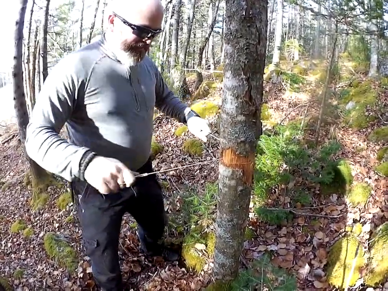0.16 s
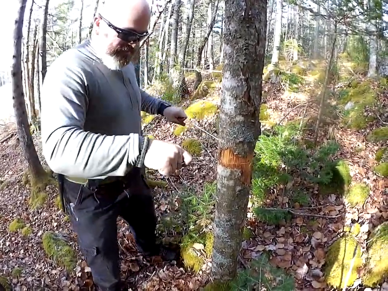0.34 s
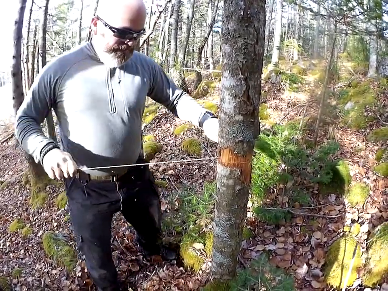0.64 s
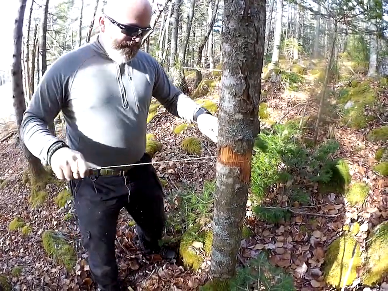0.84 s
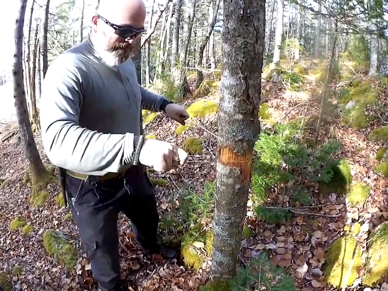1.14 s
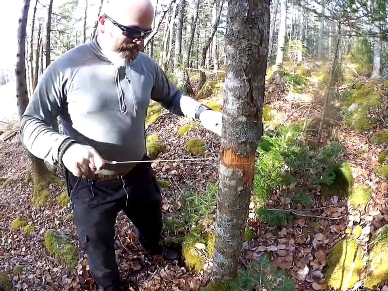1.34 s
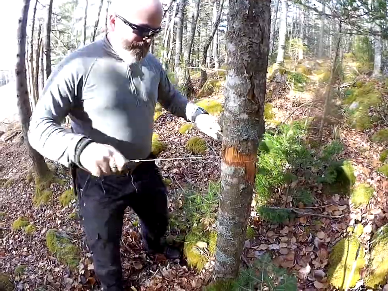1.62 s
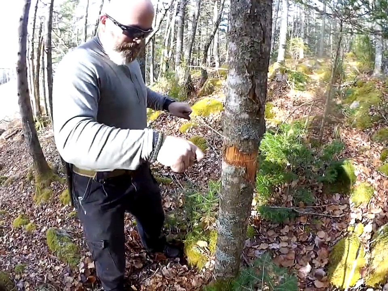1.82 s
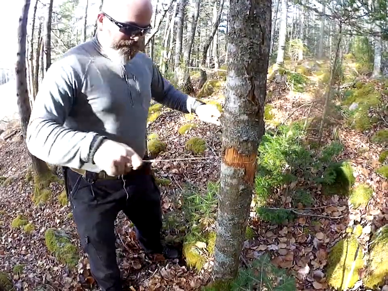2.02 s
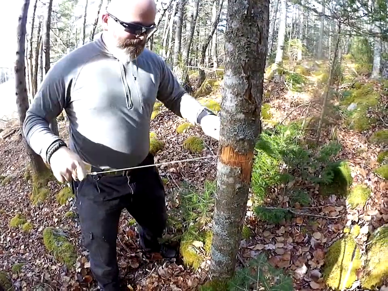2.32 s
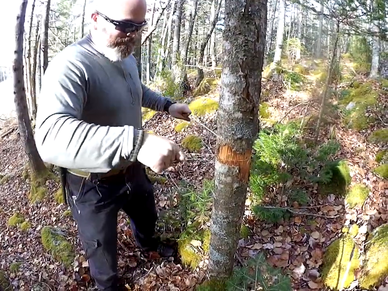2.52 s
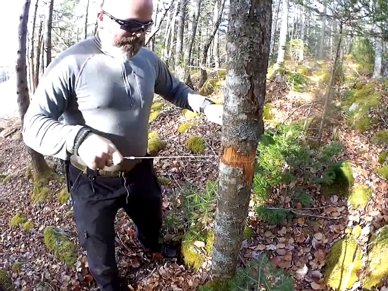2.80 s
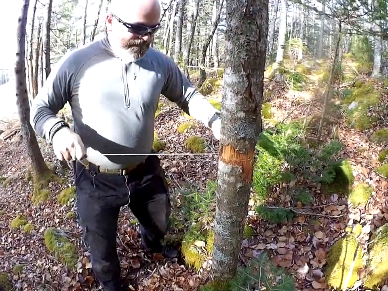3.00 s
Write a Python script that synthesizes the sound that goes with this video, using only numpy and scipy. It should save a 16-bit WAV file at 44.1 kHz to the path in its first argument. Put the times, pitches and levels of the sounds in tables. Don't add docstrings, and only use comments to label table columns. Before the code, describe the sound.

A wire saw is pulled to and fro through a thin trunk, nine short gritty rasps with small gaps, pulls louder than pushes, close to a small stereo microphone in a quiet open wood.

```python
import sys
import numpy as np
from scipy import signal
from scipy.fft import rfft, irfft, next_fast_len
from scipy.io import wavfile
from scipy.ndimage import uniform_filter1d

SR = 44100
rng = np.random.default_rng(int(sys.argv[2]) if len(sys.argv) > 2 else 0)


def amplitude_ratio(level_db):
    exponent = np.asarray(level_db, float) / 20
    return 10 ** exponent


def master(y):
    cut = np.clip(np.atleast_2d(y).T, -1, 1)
    pcm = np.round(cut * 32767)
    wavfile.write(sys.argv[1], SR, pcm.astype(np.int16))


N = 138915

# pitch_hz, level_db; pitch_hz, likeness_0_to_1
AIR_SPECTRUM = [(30, -15), (100, -4.5), (250, -9.5), (500, -10.5), (1300, -12), (2600, -16), (4500, -15.5),
                (8000, -13)]
AIR_LIKENESS = [(60, 0.42), (180, 0.61), (530, 0.72), (1600, .5), (4770, 0.2), (10000, 0.26)]
# pitch_hz, likeness_0_to_1
SAW_LIKENESS = [(200, 1), (700, 1), (2000, 0.98), (4000, 0.64), (7000, 0.46), (12000, 0.27)]
# pitch_hz, difference_db
PORT_LEAN = [(60, 0), (250, -3), (500, 1), (1300, -7), (2500, 0), (4700, 1), (8000, 3.8), (12000, -4)]
# pitch_hz, lead_rad
PORT_LEAD = [(0, -0.93), (520, 0.4), (950, -0.79), (1640, 0.94), (2150, -0.17), (2670, 0.52), (3100, 0.027),
             (4910, 0.51)]
# start_s, level_db, pitch_hz
GRABS = [
    (.066, -60.5, 228.5),
    (.425, -62, 331),
    (.797, -60, 299),
    (1.185, -63.5, 269),
    (1.548, -60.5, 291),
    (2.315, -60.5, 243.9),
    (2.691, -63, 209.8),
    (3.073, -61.5, 296),
    (3.099, -65, 215),
]
# start_s, peak_db, brightness_0_to_1
TICKS = [
    (0.0932, -52, 0.4),
    (0.3453, -64, .95),
    (0.3975, -62.5, 1),
    (.4239, -51, 1),
    (1.9181, -48.5, .01),
    (3.0385, -46.5, 0.09),
]
# pitch_hz, t60_s, level_db
WOOD_MODES = [(2350, .03, -3), (1800, .016, -3), (4500, .014, -11), (1200, .012, -7), (330, .02, -20)]
WIRE_MODES = [(7080, 0.0061, 14.5), (9700, 0.0044, 10), (4100, 0.004, -15), (5050, .006, -6)]
# start_s, length_s, early_effort_db, late_effort_db, top_twist_rate_hz
STROKES = [
    (.069, 0.27, -51, -51, 1255),
    (.418, .278, -48, -46.5, 1254),
    (.794, 0.31, -53.5, -50, 1251),
    (1.181, 0.27, -48, -45.5, 1247),
    (1.541, .29, -52.5, -46.5, 1286),
    (1.925, .29, -48.5, -43.5, 1258),
    (2.315, .268, -50.5, -45.5, 1280),
    (2.688, 0.27, -49, -41.5, 1280),
    (3.07, 0.29, -46.5, -58.5, 1256),
]
# centre_s, extra_db, length_s,
# centre_hz
BITES = [(0.191, -10, 0.013, 1470), (0.273, 2, 0.02, 4140), (0.315, 8.5, 0.016, 1160),
         (0.586, 5.5, 0.031, 2480), (.617, 11.5, 0.0075, 1780), (0.654, 9, 0.017, 2070),
         (0.812, 9.5, 0.024, 1200), (0.888, 7.5, 0.0094, 1430), (0.991, 5, 0.045, 4323),
         (1.029, 11.5, 0.0051, 1717), (1.247, 0, .015, 1253), (1.263, 6, 0.015, 2570),
         (1.397, 7, 0.014, 1960), (1.772, 7, 0.012, 2000), (1.972, 8.5, 0.01, 1900),
         (2.09, 4, 0.0075, 2070), (2.14, 4.5, 0.023, 1510), (2.125, 3.5, 0.021, 2920),
         (1.735, 8, 0.011, 2330), (2.375, 4, 0.043, 1950), (2.486, -4, 0.022, 1346),
         (2.746, 6, 0.014, 2195), (2.84, 4, 0.023, 2100), (2.885, 7, 0.011, 1469), (2.904, 4, 0.015, 1997),
         (3.129, 11.5, 0.009, 1520)]
# pitch_hz, level_db
PULL_SPECTRUM = [(150, -12.5), (500, -15.5), (1000, -7), (2000, -0.5), (3400, -10.5), (4600, -13),
                 (7000, -8), (12000, -15.5)]
PUSH_SPECTRUM = [(150, -4.5), (500, -10.5), (1000, -3), (2000, 1), (3400, -6.5), (4600, -9), (7000, -4),
                 (12000, -11)]
# pitch_hz, width_hz, gain_db
TRUNK_MODES = [(272, 28, 4), (1239, 143, 6), (1669, 127, -7), (1862, 73, 2), (2130, 60, 4), (2455, 69, 1),
               (3335, 88, 3.5), (4345, 940, 4)]
# pitch_hz, level_db
MIC_RESPONSE = [(30, -33), (100, -11.5), (250, -1), (4600, 1), (5800, -24), (10000, -22), (12000, -33),
                (16000, -80.5)]
HISS_SPECTRUM = [(3000, -32), (6000, -4), (9000, 3.5), (12000, -7), (14000, -13), (16000, -28)]


def evened(x):
    return x / np.sqrt(np.mean(x ** 2) + 1e-20)


def read(points, hz):
    f, value = np.transpose(points)
    return np.interp(np.log(hz + 1), np.log(f + 1), value)


def slow(seconds):
    width = max(int(seconds * SR), 2)
    once = uniform_filter1d(rng.standard_normal(N), width)
    return evened(uniform_filter1d(once, width))


def causal(gain_db):
    log_gain = np.log(amplitude_ratio(np.maximum(gain_db, -100)))
    circle = np.r_[log_gain, log_gain[-2:0:-1]]
    return np.fft.ifft(np.exp(np.conj(signal.hilbert(circle)))).real[:len(gain_db)]


def ports(near, other, likeness):
    size = next_fast_len(N + 4096)
    hz = np.fft.rfftfreq(size, 1 / SR)
    same = np.clip(read(likeness, hz), 0, 1)
    lean = amplitude_ratio(read(PORT_LEAN, hz) / 2)
    a, b = rfft(near, size), rfft(other, size)
    shared = same * a * np.exp(-1j * read(PORT_LEAD, hz))
    right = (shared + np.sqrt(1 - same ** 2) * b) / lean
    return np.array([irfft(a * lean, size), irfft(right, size)])[:, :N]


def air():
    air_db, rustle_db, rustle_end_s = -64, -66.5, 0.13
    rustle_hz, rustle_width_hz = 4230, 1600
    hz, t = np.fft.rfftfreq(N, 1 / SR), np.arange(N) / SR
    z = rfft(rng.standard_normal((4, N)))
    hush = evened(irfft(z[:2] * amplitude_ratio(read(AIR_SPECTRUM, hz)), N))
    hush = hush * amplitude_ratio(air_db + 0.34 * slow(0.15))
    rustle = evened(irfft(z[2:] * np.exp(-((hz - rustle_hz) / rustle_width_hz) ** 2), N))
    dying = np.clip(1 - t / rustle_end_s, 0, 1)
    return ports(*(hush + amplitude_ratio(rustle_db) * rustle * dying), AIR_LIKENESS)


def wood(x):
    level_db, t60_s, delay_s = -34, 0.099, 0.004
    t = np.arange(SR // 2) / SR
    tail = rng.standard_normal((2, len(t))) * amplitude_ratio(-60 * t / t60_s) * (t > delay_s)
    tail = tail / np.linalg.norm(tail[0])
    return amplitude_ratio(level_db) * signal.fftconvolve(x[None], tail, axes=1)[:, :N]


def grabs():
    peak_s, rise, width_hz = 0.013, 1.1, 90
    out, t = np.zeros(N + 4000), np.arange(4000) / SR
    pole = np.exp(-np.pi * width_hz / SR)
    for start_s, level_db, pitch_hz in GRABS:
        noise = rng.standard_normal(len(t)) + 1j * rng.standard_normal(len(t))
        wobble = signal.lfilter([1], [1, -pole], noise)
        carrier = np.exp(2j * np.pi * pitch_hz * (t + rise * t ** 2 / 0.1))
        swell = np.e * t / peak_s * np.exp(-t / peak_s)
        out[round(start_s * SR):][:len(t)] += amplitude_ratio(level_db) * evened((wobble * carrier).real) * swell
    return out[:N]


def ring(modes, t):
    return sum(amplitude_ratio(db - 60 * t / t60) * np.sin(2 * np.pi * f * t) for f, t60, db in modes)


def ticks():
    crack_db, crack_t60_s, crack_hz, crack_width_hz = -3, 0.022, 2050, 900
    out, t = np.zeros(N + 2000), np.arange(2000) / SR
    early = t[:60]
    knock = np.exp(-np.pi * crack_width_hz * early) * np.sin(2 * np.pi * crack_hz * early) * early
    dull, thin = ring(WOOD_MODES, t), ring(WIRE_MODES, t)
    for start_s, peak_db, brightness in TICKS:
        bright = np.clip(brightness, 0, 1)
        crack = evened(np.convolve(rng.standard_normal(len(t)), knock, "same"))
        crack = crack * amplitude_ratio(crack_db - 60 * t / crack_t60_s)
        tick = (1 - bright) * (dull + crack) + bright * thin
        out[round(start_s * SR):][:len(t)] += amplitude_ratio(peak_db + 1.5) * tick
    return out[:N]


def motion():
    arch, skew, loud_law, knee = 0.75, 0.91, 1.144, 0.6
    t = np.arange(N) / SR
    rate, effort = np.zeros(N), np.zeros((2, N))
    for k, (start_s, length_s, early_db, late_db, top_hz) in enumerate(STROKES):
        u = np.clip((t - start_s) / length_s, 0, 1)
        speed = np.abs(np.sin(np.pi * u ** skew)) ** arch * (u > 0) * (u < 1)
        rate += top_hz * speed
        loudness = np.minimum(speed / knee, 1) ** loud_law
        effort[k % 2] += loudness * amplitude_ratio(early_db + (late_db - early_db) * u)
    waver_db = slow(0.006)
    return rate, effort * amplitude_ratio(waver_db)


def contact(rate):
    spread, jitter_turns, twist_db = 0.095, 0.15, 1.1
    grit_db, grit_per_s, grit_spread_db, grit_law = 6, 4000, 7, 0.53
    turns = np.cumsum(rate * (1 + spread * slow(0.01))) / SR + jitter_turns * slow(0.0004)
    turns = np.maximum.accumulate(turns)
    twists = np.diff(np.floor(turns), prepend=0) * amplitude_ratio(twist_db * slow(0.00067))
    twists -= uniform_filter1d(uniform_filter1d(twists, size=300), size=300)
    twists = twists * np.sqrt(SR / np.maximum(rate, 150))
    tear_db = grit_spread_db * np.minimum(rng.exponential(1, N), 3.5)
    grit = rng.standard_normal(N) * amplitude_ratio(tear_db) * (rng.random(N) < grit_per_s / SR)
    grit = evened(np.diff(grit, prepend=0))
    return twists + amplitude_ratio(grit_db) * grit * (rate / rate.max()) ** grit_law


def saw(rate, effort):
    hz = np.fft.rfftfreq(4096, 1 / SR)
    trunk_db = sum(db / (1 + (2 * (hz - f) / width) ** 2) for f, width, db in TRUNK_MODES)
    push, pull = effort
    out = np.zeros((2, N))
    for gain, spectrum in ((pull, PULL_SPECTRUM), (push, PUSH_SPECTRUM)):
        body = causal(read(spectrum, hz) + trunk_db)
        body = body / np.linalg.norm(body)
        for side in out:
            scrape = sum(contact(rate * strand) for strand in (0.94, 1.07))
            side += signal.oaconvolve(gain * scrape, body)[:N]
    return out


def shade(x, rate):
    bite_octaves, patchy_db = 0.57, 2.8
    dull_db_per_octave, dull_order = 2, 3.57
    hz, t, z = signal.stft(x, SR, nperseg=256, noverlap=192)
    octave = np.log2(hz[:, None] + 1)
    bite_db = sum(db * np.exp(-((t - s) / length) ** 2 - ((octave - np.log2(f)) / bite_octaves) ** 2)
                  for s, db, length, f in BITES)
    corner = np.log2(dull_order * np.interp(t * SR, np.arange(N), rate) + 100)
    dull_db = dull_db_per_octave * np.maximum(octave - corner, 0)
    patches = rng.standard_normal(z.shape[:0:-1])
    patches = uniform_filter1d(uniform_filter1d(patches, size=14, axis=0), size=3, axis=1).T
    gain = amplitude_ratio(bite_db - dull_db + patchy_db * evened(patches))
    return signal.istft(z * gain, SR, nperseg=256, noverlap=192)[1][:, :N]


def scene():
    rate, effort = motion()
    near, other = shade(saw(rate, effort), rate) + ticks() + grabs()
    return ports(near, other, SAW_LIKENESS) + wood(near) + air()


def top_cut(x):
    return signal.sosfilt(signal.butter(12, 15800, fs=SR, output="sos"), x)


def record(dry):
    dip_hz, dip_width_hz, dip_depth_db = 7990, 110, -20
    hiss_db, end_fade_s = -83, 0.003
    hz = np.fft.rfftfreq(4096, 1 / SR)
    dip_db = dip_depth_db / (1 + (2 * (hz - dip_hz) / dip_width_hz) ** 2)
    microphone = causal(read(MIC_RESPONSE, hz) + dip_db)
    circuit = causal(read(HISS_SPECTRUM, hz) + dip_db)
    heard = signal.oaconvolve(dry, microphone[None], axes=1)[:, :N]
    hiss = signal.oaconvolve(rng.standard_normal((2, N)), circuit[None], axes=1)[:, :N]
    left_s = np.arange(N)[::-1] / SR
    fade = np.sin(np.pi / 2 * np.minimum(left_s / end_fade_s, 1)) ** 2
    return top_cut(fade * (heard + amplitude_ratio(hiss_db) * evened(hiss)))


dry = scene()
out = record(dry)
master(out)
```